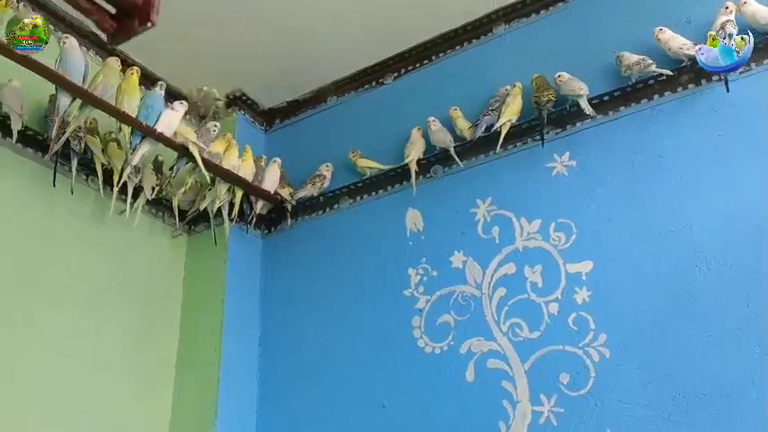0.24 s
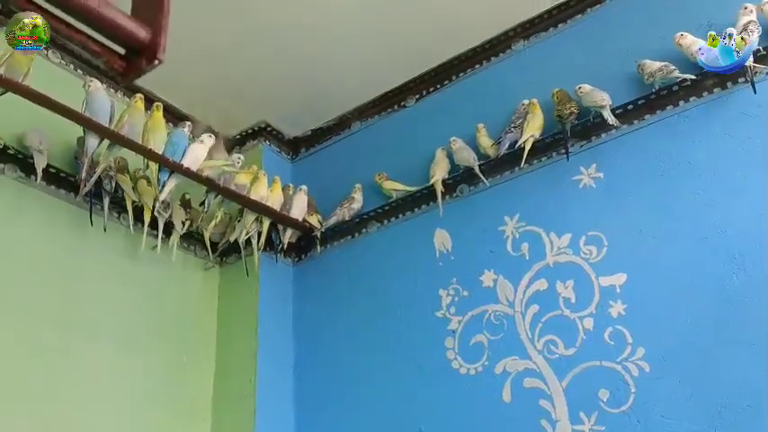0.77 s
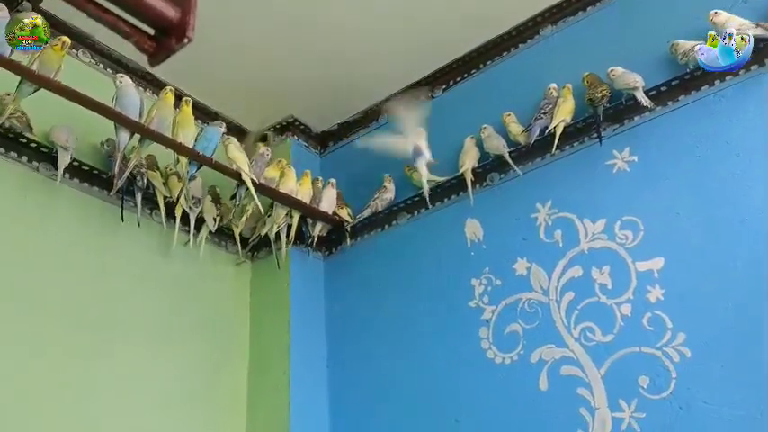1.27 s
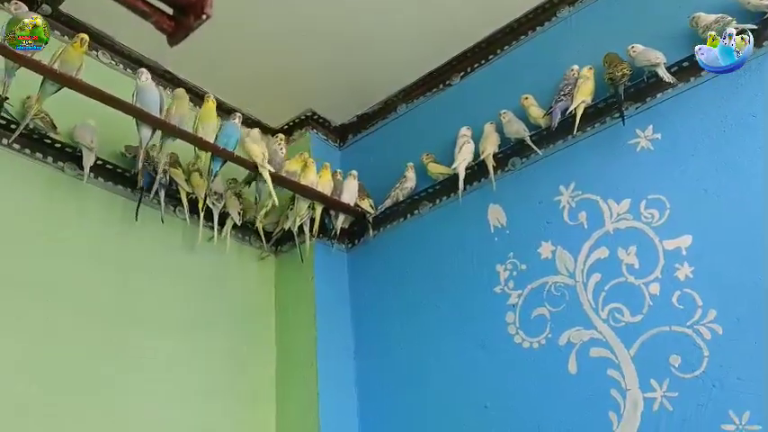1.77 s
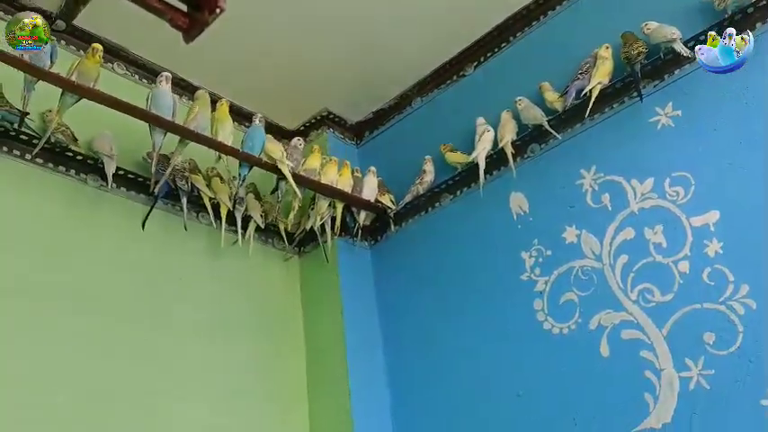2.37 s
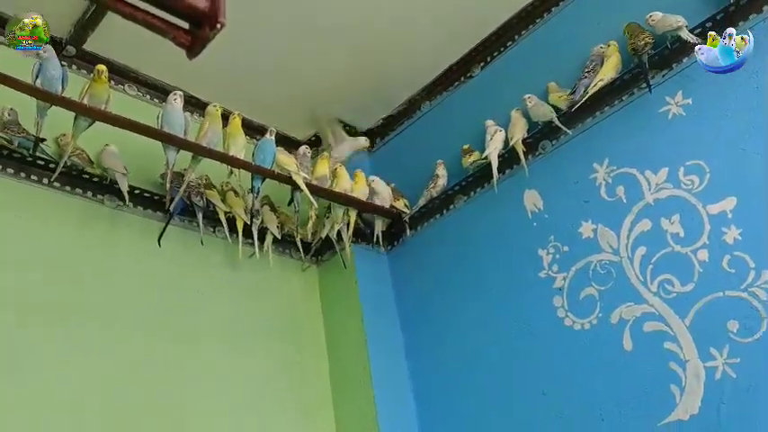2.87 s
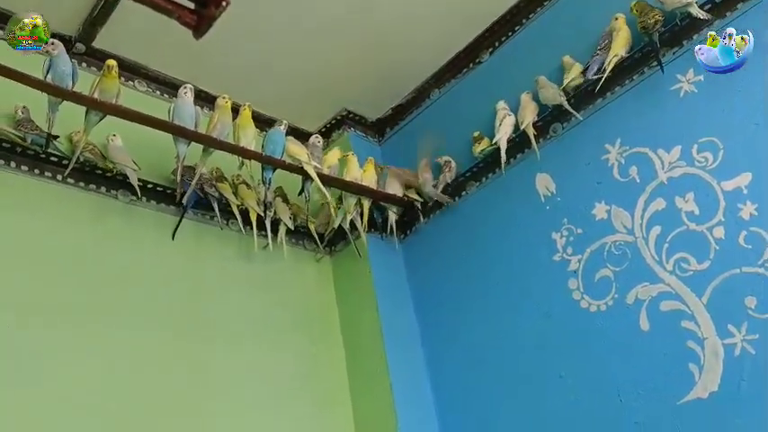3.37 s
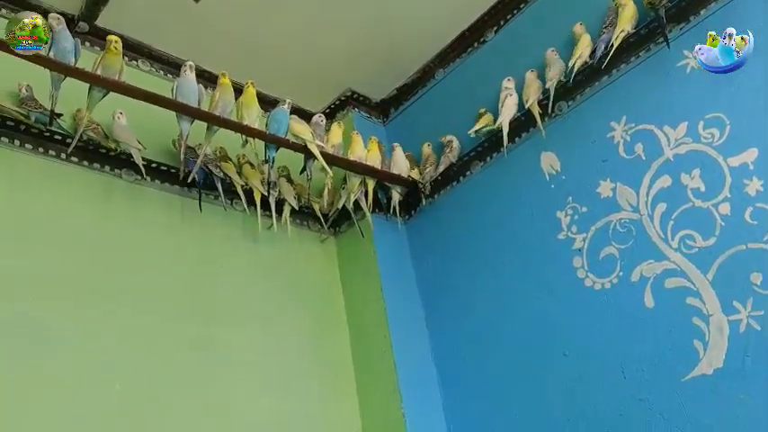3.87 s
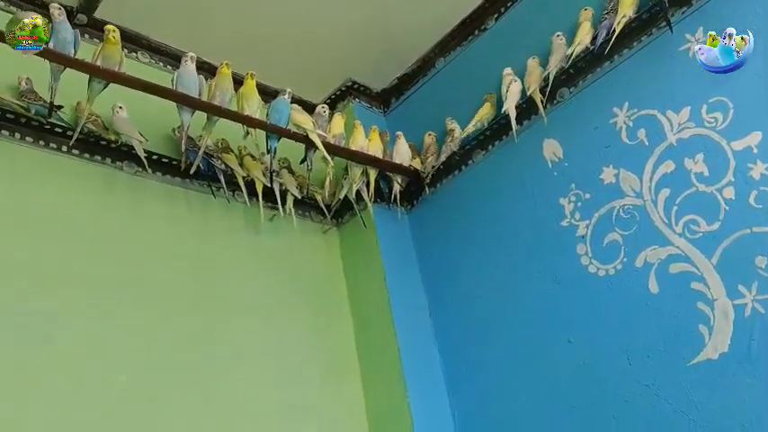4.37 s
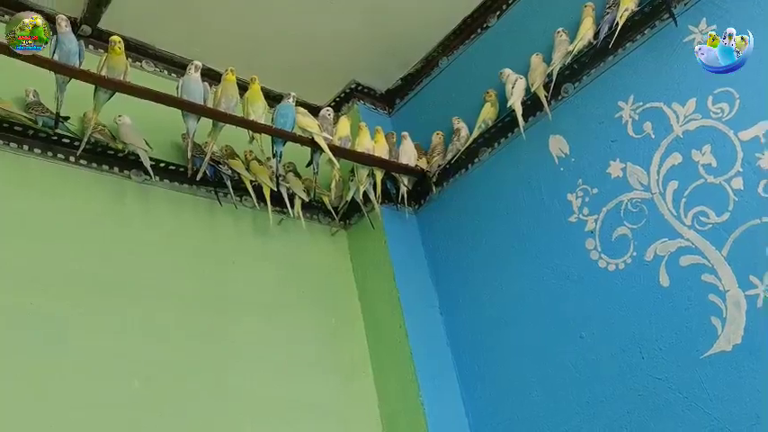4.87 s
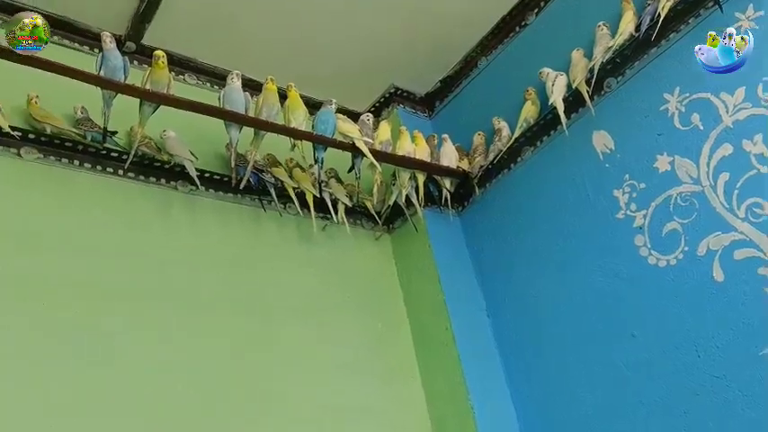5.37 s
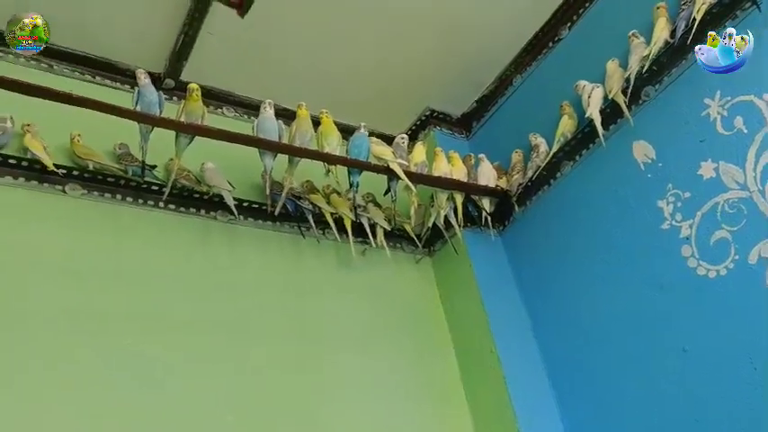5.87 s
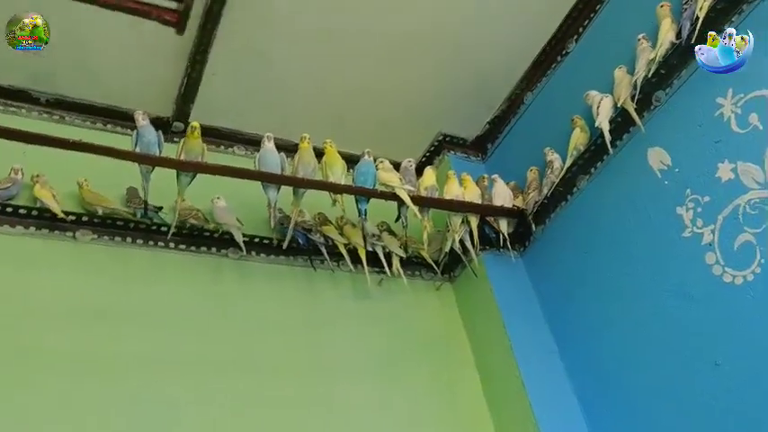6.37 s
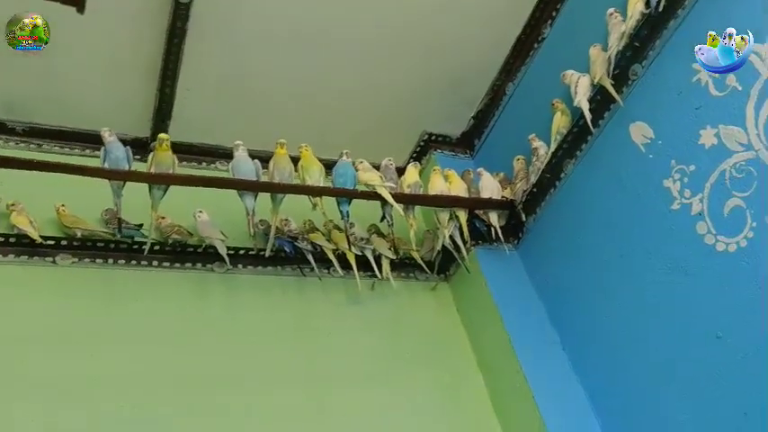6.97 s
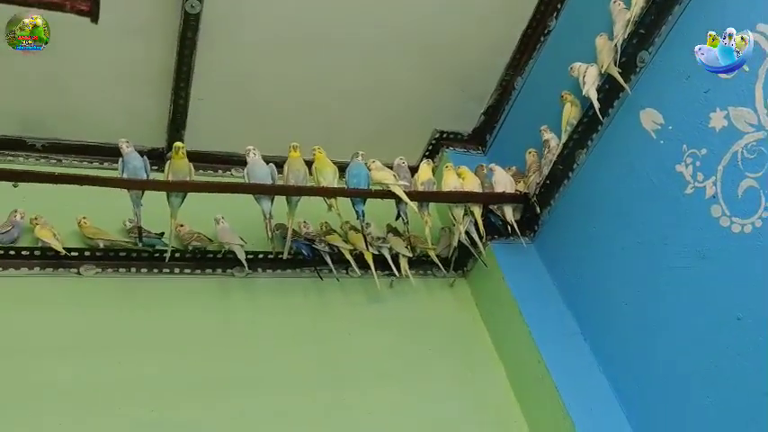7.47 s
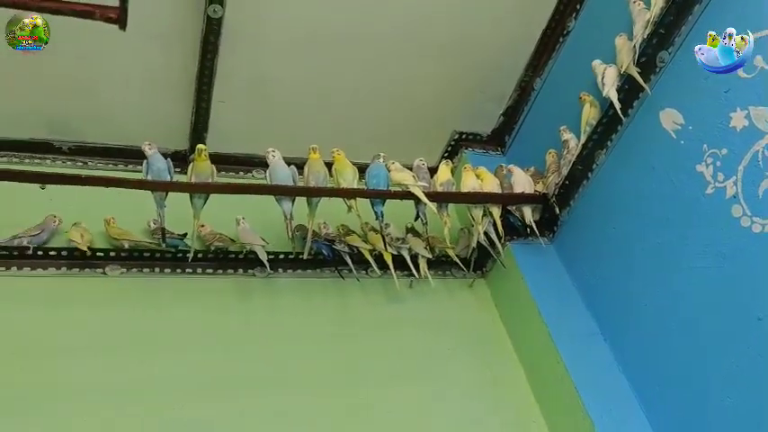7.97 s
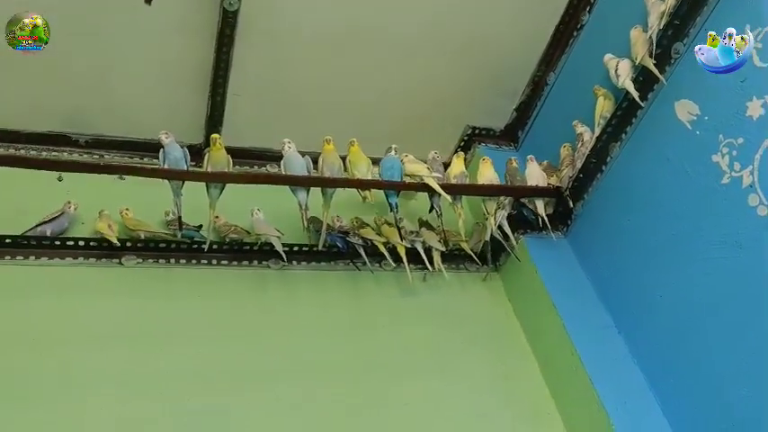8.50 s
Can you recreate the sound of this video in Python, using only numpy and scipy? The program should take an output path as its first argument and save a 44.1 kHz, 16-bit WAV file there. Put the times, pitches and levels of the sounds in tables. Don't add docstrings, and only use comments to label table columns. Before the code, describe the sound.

A flock of small parrots chirps, warbles and squawks harshly in a bare room, pausing briefly over fan hum before chattering again.

```python
import sys
import numpy as np
from scipy import signal
from scipy.fft import irfft
from scipy.io import wavfile
from scipy.ndimage import uniform_filter1d, minimum_filter1d

SR = 44100
rng = np.random.default_rng(int(sys.argv[2]) if len(sys.argv) > 2 else 0)


def rack_gain(trim_db):
    fader = np.asarray(trim_db, float)
    return 10 ** (fader / 20)


def transcribe(u):
    v = np.clip(np.atleast_2d(u).T, -1, 1)
    q = np.round(v * 32767).astype(np.int16)
    wavfile.write(sys.argv[1], SR, q)


N = 385434

# f/Hz, level/dB per Hz
DRAUGHT_SPECTRUM = [(25, -40), (150, -6), (240, -40), (323, -30.5), (615, -4.5), (1810, -8.5), (2240, -8.5),
                    (4500, -13.5), (6300, -21.5), (8500, -29.5), (12000, -22.5), (15600, -35)]
# f/Hz, bandwidth/Hz, level/dB
DRAUGHT_RESONANCES = [(239.6, 61, -37), (394.2, 26.4, -43.5), (616, 79, -54)]
# f/Hz, correlation/1
DRAUGHT_CORRELATION = [(60, 0.31), (180, 0.92), (550, 0.59), (1650, -0.3), (4970, 0.059), (15000, -0.0034)]
# multiple/1, level/dB
SHAFT_HARMONICS = [(1, -54), (2, -51.5), (4, -41), (9, -73), (10, -49.5), (25, -54.5)]
# t/s, level/dB
BLADE_SWELL = [(0, -64), (2.4, -54), (3.1, -57), (3.4, -54.5), (7.4, -47), (8.74, -46.5)]
# f/Hz, T60/s
REVERBERATION = [(3000, .18), (6000, .16), (12000, .1)]
# delay/s, level/dB
EARLY_REFLECTIONS = [(.004, -4), (.008, -10.5), (.013, -0.5), (.021, -13.5)]
# t/s, left minus right level/dB
FACING = [(0, -5), (1.7, 1.5), (2.3, 1.5), (3.6, 0.5), (4.1, -2), (6, -1), (7.6, 0), (8.74, 0)]
# t/s, length/s, level/dB
RASPS = [
    (3.66, 0.053, -40),
    (5.445, 0.088, -43.5),
    (6.155, 0.1, -35),
    (6.737, .09, -43.5),
    (7.74, .09, -43),
    (8.458, .12, -41),
]
# f/Hz, level/dB
THROAT_COLOUR = [(590, -78), (1000, -102), (1400, 14), (3040, -1), (3530, 5.5), (4010, 5.5), (4920, 3),
                 (6260, -0.5), (7030, -8), (14500, -15), (15500, -63)]
# t/s, level/dB
ORDINARY_SQUAWKS = [(1.231, -24), (1.293, -23), (1.368, -23), (1.438, -23.5), (1.52, -29), (1.584, -26),
                    (1.648, -28), (1.711, -24.5), (1.762, -23.5), (1.837, -25), (1.894, -18), (1.94, -24),
                    (2.042, -22.5), (2.111, -24), (2.212, -21), (2.301, -25), (2.388, -26), (2.474, -26.5),
                    (2.767, -23), (2.827, -18.5), (2.883, -22), (2.95, -19.5), (3.007, -20.5), (3.064, -21),
                    (3.123, -22), (3.191, -21), (3.372, -23), (3.438, -27.5), (3.5, -23), (3.648, -22.5),
                    (0, -34.5), (0.199, -37.5), (0.63, -35.5), (0.967, -24.5), (1.05, -26.5), (3.268, -23),
          (3.876, -32), (6.693, -28.5), (7.693, -30.5), (7.94, -31.5), (8.015, -34), (8.094, -37),
          (8.174, -31), (8.366, -27.5), (8.431, -26.5), (8.496, -26), (8.56, -26)]
# t/s, level/dB, pulse rate/Hz, roughness/1
SCREECHES = [
    (1.982, -18.5, 1333, 0.6),
    (2.544, -14, 1532, 0.3),
    (2.62, -15, 1494, 0.38),
    (2.694, -12.5, 1498, 0.45),
    (3.321, -22.5, 1408, 0.78),
    (3.558, -17.5, 1574, 0.7),
    (5.317, -38.5, 1450, 0.67),
    (5.035, -38, 1400, 0.6),
]
# t/s, level/dB, beak resonance f/Hz
FAR_SQUAWKS = [
    (.894, -25, 6900),
    (3.764, -26.5, 7060),
    (4.019, -38, 6100),
]
# t/s, length/s, start f/Hz,
# level/dB
HELD_REPLIES = [(0.0, 0.0069, 6420, -24), (0.0, 0.0078, 4650.0, -19.5), (0.208, 0.028, 6960.0, -42),
                (1.251, 0.028, 3750, -21), (1.263, 0.008, 4620, -21), (1.301, 0.01, 5700, -22),
                (1.411, 0.023, 3630.0, -27), (1.525, 0.016, 4340, -17), (1.527, 0.034, 3725, -19),
                (1.54, 0.0097, 3110.0, -17), (1.656, 0.01, 4460.0, -27), (1.678, 0.016, 4460, -22),
                (1.688, 0.024, 1670, -29), (1.774, 0.01, 2590.0, -18), (1.786, 0.013, 4770, -20),
                (1.864, 0.012, 4940, -13), (2.049, 0.034, 3080, -17), (2.127, 0.01, 4740.0, -27),
                (2.153, 0.01, 5990.0, -31), (2.171, 0.019, 2370.0, -26), (2.359, 0.031, 2675, -21),
                (2.478, 0.012, 1800, -26), (2.49, 0.016, 4920, -20), (2.546, 0.008, 7000, -15),
                (2.887, 0.0096, 6480, -15), (3.195, 0.014, 4630.0, -11), (3.534, 0.03, 5070, -17),
                (3.745, 0.017, 4590, -24), (3.859, 0.0063, 4900, -26), (3.867, 0.013, 1760, -30),
                (4.037, 0.0085, 5900, -28), (4.091, 0.018, 2966, -23.5), (4.783, 0.012, 3600, -25.5),
                (5.484, 0.01, 3660, -17.5), (5.503, 0.0088, 3624, -19), (5.739, 0.02, 3480, -11),
                (5.789, 0.023, 3470, -11), (5.821, 0.012, 4675, -27), (6.192, 0.018, 2690, -14),
                (6.236, 0.014, 2320.0, -19), (6.485, 0.0066, 3600, -19), (6.723, 0.051, 3145, -20),
                (6.725, 0.0076, 3780, -5), (7.71, 0.011, 3440, -6), (8.161, 0.016, 5090, -35),
                (8.469, 0.0075, 2970.0, -10), (8.523, 0.019, 3407, -11.5), (8.586, 0.0071, 2300.0, -24),
                (.29, 0.023, 3240, -25.5), (.655, 0.011, 3140, -30.5), (2.135, 0.036, 5810, -24),
               (3.79, 0.051, 7300, -32), (3.819, 0.039, 10820, -37), (4.715, .025, 1640, -38),
               (5.005, .015, 3880, -30), (5.165, .012, 4480, -35), (5.659, 0.017, 5235, -29.5),
               (5.72, .02, 2636, -15), (5.78, 0.014, 6050, -38), (6.948, 0.01, 5430, -36),
               (7.016, .03, 4680, -23), (7.03, .03, 5600, -34), (7.055, .035, 5860, -37),
               (7.1, .02, 5690, -37), (7.11, .03, 2970, -31), (8.18, .02, 8280, -32),
               (8.39, .02, 1600, -32)]
# t/s, length/s, start f/Hz, level/dB
RISING_REPLIES = [(0.0, 0.009, 5730, -29), (0.449, 0.013, 2880, -25.5), (1.211, 0.011, 1910, -27),
                  (1.227, 0.0088, 2220, -28), (1.241, 0.011, 6150, -19), (1.381, 0.008, 6600, -25),
                  (1.606, 0.012, 3710, -15.5), (1.898, 0.024, 5210, -25), (2.151, 0.015, 3700, -19),
                  (2.221, 0.0095, 2300, -25), (2.307, 0.0094, 2230.0, -25), (2.313, 0.01, 4950.0, -21),
                  (2.333, 0.005, 5020.0, -22), (2.399, 0.008, 5160.0, -20), (2.544, 0.03, 4960, -27),
                  (3.199, 0.013, 3020, -26), (3.406, 0.0077, 5790.0, -29), (3.724, 0.0085, 2940, -18.5),
                  (3.831, 0.008, 4950, -25), (5.336, 0.0072, 4510.0, -27), (5.849, 0.01, 2624, -18),
                  (5.956, 0.0089, 4470.0, -17), (6.1, 0.008, 1930, -30), (6.23, 0.01, 4320, -18),
                  (6.787, 0.0072, 4713, -22), (7.491, 0.008, 4540, -29), (7.786, 0.012, 4180.0, -20),
                  (8.024, 0.008, 5260, -21)]
# t/s, length/s, start f/Hz, level/dB
DROPPING_REPLIES = [(0.387, 0.0068, 2730, -12), (0.932, 0.008, 6300.0, -26), (0.974, 0.013, 5120, -32),
                    (1.235, 0.008, 4750, -17), (1.84, 0.008, 5030, -22), (1.974, 0.01, 4150, -12),
                    (2.397, 0.0085, 2700, -20), (3.005, 0.018, 4220, -12), (3.067, 0.055, 5240.0, -16),
                    (3.075, 0.008, 3100, -18), (3.119, 0.014, 5070, -24), (3.191, 0.008, 6220, -21),
                    (3.314, 0.0057, 1820.0, -39.5), (3.326, 0.008, 6260, -14), (3.41, 0.0088, 3350, -16.5),
                    (3.516, 0.01, 4720, -19), (3.534, 0.012, 3290.0, -26), (3.54, 0.0092, 6030.0, -13),
                    (3.704, 0.0067, 1800, -21), (5.607, 0.0065, 3380, -15), (5.909, 0.0092, 2420.0, -32),
                    (5.994, 0.0094, 4440, -24), (6.822, 0.0076, 3130, -14), (6.846, 0.023, 3200.0, -29),
                    (7.457, 0.0095, 4030, -12), (8.457, 0.008, 3270, -15), (8.608, 0.008, 3970.0, -26),
                    (8.702, 0.0074, 4570.0, -35)]
# multiple/1, level/dB
OVERTONES = [(.5, -20.5), (2, -16), (3, -28.5), (4, -22.5)]
# t/s, length/s, start f/Hz, level/dB
HELD = [(.893, 0.03, 3430, -22), (.948, 0.011, 3950, -7.5), (1.071, 0.046, 3290, -13),
        (1.396, 0.012, 3080, -6.5), (1.627, 0.026, 3105, -17), (1.787, 0.035, 3580, -8),
        (2.104, 0.045, 2920, -21.5), (2.729, 0.038, 3550, -8), (2.778, 0.037, 3850, -9.5),
        (3.6, 0.015, 3980, -2.5), (3.639, 0.038, 3100, -14), (3.731, 0.11, 3190, -28),
        (3.793, 0.06, 3065, -15), (3.843, 0.043, 3040, -16.5), (5.387, 0.019, 3845, -13),
        (5.537, 0.026, 3290, -10), (5.739, .02, 3495, -13), (6.062, 0.0338, 3515, -18),
        (6.516, .031, 2910, -19.5), (6.714, 0.079, 3225, -22), (7.539, 0.018, 3505, -6),
        (7.855, 0.053, 3100, -50), (8.29, 0.062, 3225, -6), (8.513, 0.013, 2925, -12),
        (8.52, 0.014, 3460, -15.5), (8.625, 0.014, 3530, -5.5)]
# t/s, length/s, start f/Hz, level/dB
LOW = [(.312, 0.016, 2693, -20), (.345, 0.022, 3070, -25), (.337, 0.01, 2990, -19.5),
       (.427, 0.031, 2050, -25), (1.135, 0.029, 2173, -23.5), (2.429, 0.031, 2720, -15.5),
       (5.447, 0.074, 2805, -19.5), (5.648, 0.055, 2637, -15.5), (5.822, 0.07, 2294, -30),
       (5.94, 0.0079, 1380, -29), (6.218, 0.023, 1774, -23), (6.754, 0.043, 1765, -26.5),
       (7.558, 0.0088, 2080, -44), (7.655, 0.032, 2065, -22), (8.347, 0.0093, 2380, -18),
       (8.426, 0.013, 2654, -13)]
# t/s, length/s, start f/Hz, level/dB
RISING = [(.367, 0.028, 2230, -16), (1.474, 0.015, 2320, -12), (1.653, 0.032, 2993, -17),
          (1.724, 0.018, 3064, -16.5), (2.412, 0.016, 2330, -17), (2.484, 0.054, 2524, -22),
          (2.827, 0.041, 3140, -7), (3.626, 0.013, 3246, -13), (5.858, 0.014, 3060, -17),
          (6.103, 0.048, 2444, -20.5), (6.146, 0.015, 3440, -7), (6.166, 0.038, 3070, -9),
          (6.222, 0.027, 3440, -11.5), (6.243, 0.016, 3036, -3), (6.696, 0.011, 4350, -1.5),
          (6.805, 0.023, 3064, -17), (7.684, 0.02, 2480, -21.5), (7.693, 0.032, 4060, -8.5),
          (7.719, 0.024, 3070, -5.5), (7.81, 0.022, 3070, -14), (8.207, 0.034, 3980, -11.5),
          (8.276, 0.01, 3543, 3), (8.368, 0.01, 2990, -7.5)]
# t/s, length/s, start f/Hz, level/dB
FLICKS = [(1.168, 0.046, 2484, -27.5), (1.282, 0.0073, 3140, -14), (1.372, 0.011, 2295, -17),
          (1.436, 0.022, 2530, -14.5), (1.705, 0.0098, 2290, -19), (5.699, 0.016, 3400, -16),
          (6.766, 0.03, 2920, -11), (7.438, .018, 2785, -9.5), (7.466, .012, 3460, -11),
          (7.503, 0.015, 2830, -11.5), (7.772, 0.022, 2910, -3.5), (8.415, .012, 2432, -17),
          (8.678, 0.022, 2930, -10.5)]
# t/s, length/s, start f/Hz, level/dB
SAGGING = [(.979, 0.065, 3344, -14), (1.318, 0.062, 3610, -16), (1.556, 0.049, 3311, -15.5),
           (1.753, 0.027, 3625, -13), (2.041, 0.021, 3936, -12), (2.345, 0.032, 3207, -14.5),
           (3.692, 0.065, 3650, -16), (3.927, 0.072, 2654, -30.5), (5.775, .013, 3170, -6.5),
           (5.793, 0.022, 3530, -17), (6.034, 0.029, 2962, -14), (7.382, .03, 2495, -37),
           (7.399, 0.015, 3270, -14.5), (7.465, 0.015, 3085, -21), (7.599, 0.034, 3644, -13),
           (8.244, 0.0081, 3693, -2), (8.365, 0.026, 2403, -16), (8.468, 0.039, 3600, -6.5)]
# t/s, length/s, start f/Hz, level/dB
DROPPING = [(.277, 0.019, 3545, -25), (1.028, 0.019, 4035, -13), (1.42, 0.028, 2582, -15),
            (1.735, 0.018, 3303, -16), (1.798, 0.018, 3725, -8), (1.813, .015, 3780, -39),
            (2.309, 0.013, 3930, -14), (4.79, 0.05, 3300, -42), (4.99, 0.069, 5050, -31),
            (4.999, 0.022, 2620, -28.5), (5.407, 0.022, 3375, -13), (5.534, 0.026, 4630, -14),
            (5.591, 0.013, 3200, -17.5), (5.605, 0.031, 3885, -10), (5.72, 0.015, 3155, -11),
            (6.133, 0.023, 4410, -11), (7.411, 0.012, 3820, -9), (7.525, .022, 4340, -16),
            (8.575, 0.058, 3330, -16)]
# delay/s, length/s, start f/Hz, end f/Hz, level/dB
CONTACT_CALL = [
    (.002, .022, 2714, 3773, -10),
    (.02, 0.0244, 3960, 3725, -7),
    (.078, 0.017, 2865, 3630, -7.5),
]
# delay/s, length/s, start f/Hz, end f/Hz, level/dB
ANSWER_CALL = [
    (0, 0.039, 4133, 4163, 0.5),
    (.052, 0.0297, 3135, 3290, 1.5),
    (.092, .032, 3190, 3000, -5),
]
# t/s, level/dB, pitch ratio/1
CONTACTS = [
    (3.315, -11, 0.9),
    (5.902, -4, 0.99),
    (6.487, -5.5, .99),
    (6.945, -3.5, 1.003),
    (7.15, -5, .99),
    (7.956, -2, 1.024),
]
# t/s, level/dB, pitch ratio/1
ANSWERS = [
    (.513, -19.5, 1.005),
    (3.97, -22.5, .995),
]


def evened(x):
    return x / np.sqrt(np.mean(x ** 2) + 1e-20)


def read(points, hz):
    f, value = np.transpose(points)
    return np.interp(np.log(hz + 1), np.log(f + 1), value)


def add(mix, s, sound):
    part = mix[round(s * SR):][:len(sound)]
    part += sound[:len(part)]


def wander(length, hz):
    lowpass = signal.butter(2, hz, fs=SR, output="sos")
    return evened(signal.sosfilt(lowpass, rng.standard_normal(length)))


def swell(length_s, rise_s, fall_s):
    t = np.arange(0, length_s + 4 * fall_s, 1 / SR)
    onset = np.sin(np.pi / 2 * np.minimum(t / rise_s, 1)) ** 2
    return t, onset * np.exp(-np.maximum(t - length_s, 0) / fall_s)


def fan():
    frames, hz = N // 512 + 5, np.fft.rfftfreq(2048, 1 / SR)
    a, b, c, d, patches = rng.standard_normal((frames, 1025, 5)).T
    patches = evened(uniform_filter1d(uniform_filter1d(patches, 12, 0), 6, 1))
    same = np.clip(read(DRAUGHT_CORRELATION, hz), -1, 1)[:, None]
    left = a + 1j * b
    right = same * left + np.sqrt(1 - same ** 2) * (c + 1j * d)
    z = np.array([left, right]) * rack_gain(1.4 * patches)

    def filtered(response):
        return evened(signal.istft(z * response[:, None], nperseg=2048)[1][:, :N])

    out = rack_gain(-33) * filtered(rack_gain(read(DRAUGHT_SPECTRUM, hz)))
    for ring_hz, width_hz, db in DRAUGHT_RESONANCES:
        out += rack_gain(db) * filtered(1 / (1 + (2 * (hz - ring_hz) / width_hz) ** 2))
    shaft_hz = 43.4 * (1 + 0.002347 * wander(N, 1))
    turns = 2 * np.pi * np.cumsum(shaft_hz) / SR
    blade_db = np.interp(np.arange(N) / SR, *np.transpose(BLADE_SWELL))
    for k, db in SHAFT_HARMONICS:
        level_db = db + 1.74 * wander(N, 2.2) + (k == 2) * (blade_db - blade_db.mean())
        out += np.sqrt(2) * rack_gain(level_db) * np.sin(k * turns + 2 * np.pi * rng.random())
    return out * rack_gain([[.1], [-.1]])


def room(x, wet_db, left_db, shade=0):
    right_lag, shade_lag = 17, 5
    count = 1000
    taps = np.zeros((2, 20 * count + 400))
    at = 200 + 20 * np.arange(count) + rng.integers(0, 20, (2, count))
    np.put_along_axis(taps, at, rng.choice([-1., 1.], at.shape), 1)
    hz, t, z = signal.stft(taps, SR, nperseg=256)
    decay = rack_gain(-60 * t / read(REVERBERATION, hz)[:, None])
    tail = signal.istft(z * decay, SR, nperseg=256)[1]
    tail *= rack_gain(wet_db) / np.linalg.norm(tail[0])
    for delay_s, db in EARLY_REFLECTIONS:
        lags = (delay_s * SR * rng.uniform(.85, 1.15, 2)).astype(int)
        tail[[0, 1], lags] += rack_gain(db) * rng.choice([-1, 1], 2)
    tail[0, 0] += rack_gain(left_db)
    tail[0, shade_lag] += shade * rack_gain(left_db)
    tail[1, right_lag] += rack_gain(-left_db)
    return signal.fftconvolve(x[None], tail, axes=1)[:, :N]


def rasps():
    out = np.zeros(N)
    for s, length_s, db in RASPS:
        add(out, s, rack_gain(db) * swell(length_s, 0.039, 0.011)[1])
    band = signal.butter(2, [11890, 13710], "bandpass", fs=SR, output="sos")
    hiss = evened(signal.sosfilt(band, rng.standard_normal(N)))
    return out * hiss * (1 + 0.53 * wander(N, 90))


def outbursts():
    def beak_hz(db):
        return 5860 + 40.5 * db

    ordinary = ORDINARY_SQUAWKS
    mood = rng.uniform(-1, 1, (len(ordinary), 3))
    rows = [(s, db, 1475 * (1 + 0.1 * a), 0.64 + 0.144 * b, beak_hz(db) * (1 + 0.03 * c))
            for (s, db), (a, b, c) in zip(ordinary, mood)]
    rows += [(*row, beak_hz(row[1])) for row in SCREECHES]
    return rows + [(s, db, 1758, 0.32, far_beak_hz) for s, db, far_beak_hz in FAR_SQUAWKS]


def squawks():
    out, shake, breath = np.zeros(N), wander(N + SR, 65.6), rng.standard_normal(N + SR)
    scratch = wander(N + SR, 270)
    habits = rng.uniform(-1, 1, (80, 2))
    for (s, db, pulse_hz, rough, beak_hz), (bend, drawl) in zip(outbursts(), habits):
        length_s = .036 + .006 * drawl + .001 * (db + 18)
        t, shape = swell(length_s, .004, .017)
        at = round(s * SR) + np.arange(len(t))
        rough = np.clip(rough, .1, 1)
        scoop = 0.1329 * np.exp(-t / 0.00737)
        droop = 77 * rough * t ** 2
        glide = 1 + 2.6 * rough * bend * t - droop - scoop
        turns = np.cumsum(pulse_hz * glide * (1 + 0.0663 * rough * shake[at])) / SR
        partials = [(1 - 0.21 * (k == 2)) * np.cos(2 * np.pi * k * turns + k * k) for k in range(2, 10)]
        folds = evened(sum(partials))
        torn = folds * scratch[at] + .15 * breath[at]
        drive = np.sqrt(1 - rough) * folds + np.sqrt(rough) * torn
        drive = drive + 5.03 * signal.lfilter(*signal.iirpeak(beak_hz, 3.5, SR), drive)
        drive = drive - rack_gain(db + 10) * np.gradient(np.gradient(drive))
        add(out, s, rack_gain(db - 4.0 - 110 * t) * shape * drive)
    colour = irfft(rack_gain(read(THROAT_COLOUR, np.fft.rfftfreq(512, 1 / SR))))
    return signal.oaconvolve(out, np.roll(colour, 256) * np.hanning(512), "same")


def glides(kinds):
    return [(s, length_s, hz, hz + hz_per_s * length_s, db)
            for table, hz_per_s in kinds for s, length_s, hz, db in table]


def replies():
    return glides([(HELD_REPLIES, 0), (RISING_REPLIES, 9000), (DROPPING_REPLIES, -9000)])


def notes():
    rows = glides([(HELD, 190), (LOW, 1560), (RISING, 4820), (FLICKS, 33000), (SAGGING, -5200), (DROPPING, -12500)])
    for call, given in [(CONTACT_CALL, CONTACTS), (ANSWER_CALL, ANSWERS)]:
        rows += [(s + after_s, length_s, from_hz * pitch, to_hz * pitch, db + note_db)
                 for s, db, pitch in given for after_s, length_s, from_hz, to_hz, note_db in call]
    return sorted(rows)


def warble():
    s, length_s, from_hz, to_hz, db = np.transpose(notes())
    t, effort, out = np.arange(N) / SR, np.zeros(N), np.zeros(N)
    for start_s, held_s, level_db in zip(s, length_s, db):
        add(effort, start_s + 0.016, rack_gain(.75 * level_db) * swell(held_s + 0.014, 0.014, 0.0039)[1])
    centre_hz = 3200 + .5 * (np.interp(t, s, np.clip(from_hz, 2500, 4200)) - 3200)
    for apart in (.88, 1.17):
        shake_phase = 2 * np.pi * np.cumsum(300 + 60 * wander(N, 15)) / SR
        shake = 0.11 * np.sin(shake_phase) + 0.045 * wander(N, 25)
        turns = 2 * np.pi * np.cumsum(centre_hz * apart * (1 + shake)) / SR
        syllables = np.clip(.5 + 0.59 * wander(N, 32.0), 0, 1.5)
        out += syllables * (np.sin(turns) + rack_gain(-24.0) * np.sin(2 * turns))
    return rack_gain(-16) * np.minimum(effort, .6) ** 1.1 * out


def whistles(rows, buzzy):
    out, throb = np.zeros(N), wander(N + SR, 173)
    buzz = 2 * np.pi * np.cumsum(260 + 70 * wander(N + SR, 22)) / SR
    for s, length_s, from_hz, to_hz, db in rows:
        t, shape = swell(length_s, 0.002, 0.002)
        at = round(s * SR) + np.arange(len(t))
        done = np.minimum(t / length_s, 1)
        held = np.clip(1 - (to_hz - from_hz) / length_s / 14000, 0, 1)
        buzzing = buzzy * held * done * np.clip((from_hz - 1900) / 1100, 0, 1)
        glide_hz = from_hz + (to_hz - from_hz) * done ** (1 + 1.63 * (1 - held))
        turns = 2 * np.pi * np.cumsum(glide_hz * (1 + 0.069 * buzzing * np.sin(buzz[at]))) / SR
        tone = np.sin(turns)
        for k, overtone_db in OVERTONES:
            tone += rack_gain(overtone_db - 2.28 * (7.5 - held)) * np.sin(k * turns)
        chopped = (1 + .5 * buzzing * np.cos(buzz[at])) * (1 + 0.32 * held * throb[at])
        swelling = 1 + .6 * (1 - held) * (done - .3)
        add(out, s, rack_gain(db + 1) * shape * tone * chopped * swelling)
    return out


def scene():
    birds = room(rasps(), -6, -1.6)
    birds += room(squawks(), -1.5, -3.2)
    birds += room(whistles(replies(), .15), -4.0, -1.3, shade=.7)
    birds += room(warble(), 0.0, -4.5)
    birds += room(whistles(notes(), .65), -5.0, -0.27, shade=0.61)
    facing_db = np.interp(np.arange(N) / SR, *np.transpose(FACING))
    return birds * rack_gain([facing_db / 2, -facing_db / 2]) + fan()


def roll_off(x):
    return signal.sosfilt(signal.butter(12, 15710, fs=SR, output="sos"), x)


def record(dry):
    power_db = 10 * np.log10(abs(uniform_filter1d((dry ** 2).mean(0), 4000)) + 1e-12)
    fall = np.arange(N) * 5.9 / SR
    over_db = np.maximum(np.maximum.accumulate(power_db + fall) - fall + 10.0, 0)
    ducked = dry / rack_gain(0.69 * uniform_filter1d(over_db, 2000))
    headroom = np.minimum(.97 / (abs(ducked).max(0) + 1e-9), 1)
    held = ducked * uniform_filter1d(minimum_filter1d(headroom, size=301), size=150)
    band_limit = signal.firwin(255, 15400, fs=SR)
    return roll_off(signal.oaconvolve(held, band_limit[None], "same"))


dry = scene()
out = record(dry)
transcribe(out)
```